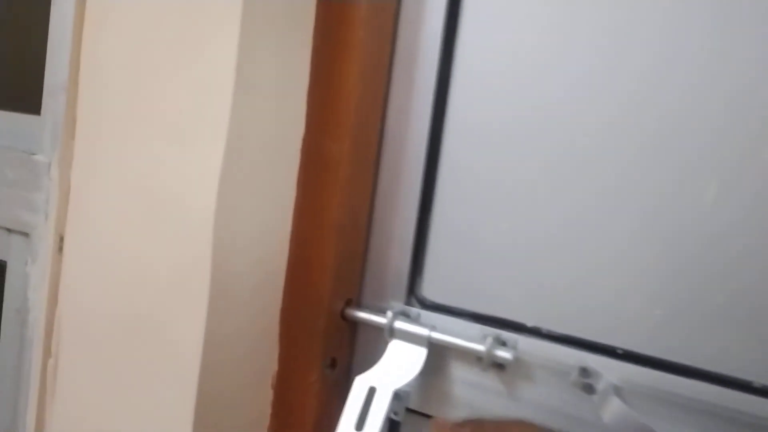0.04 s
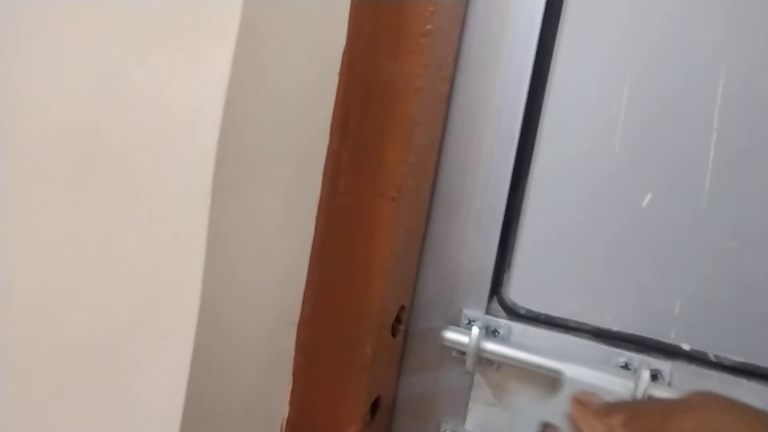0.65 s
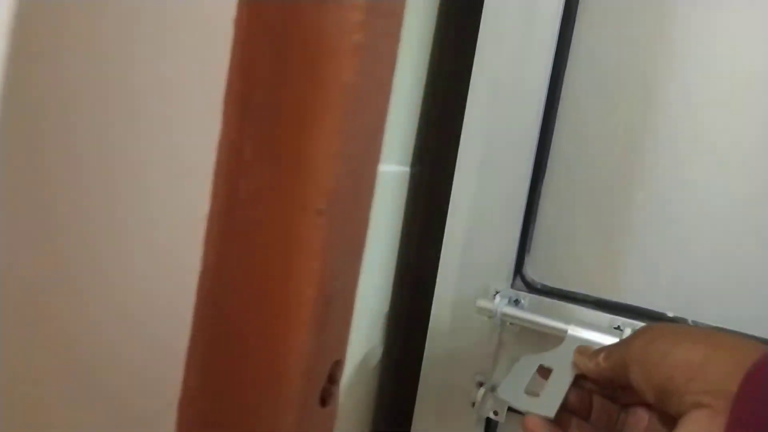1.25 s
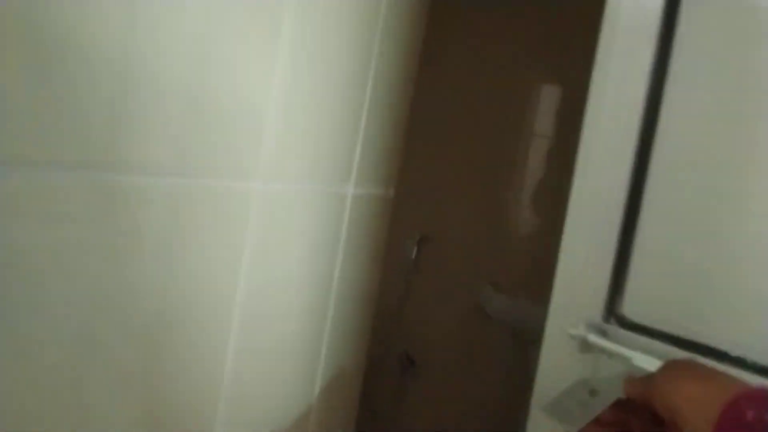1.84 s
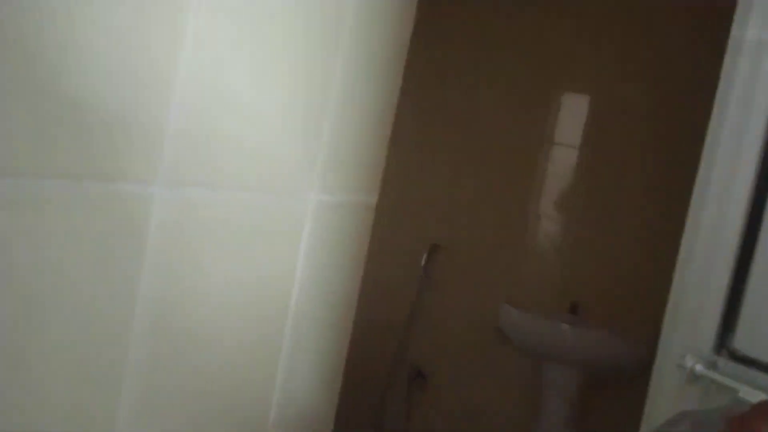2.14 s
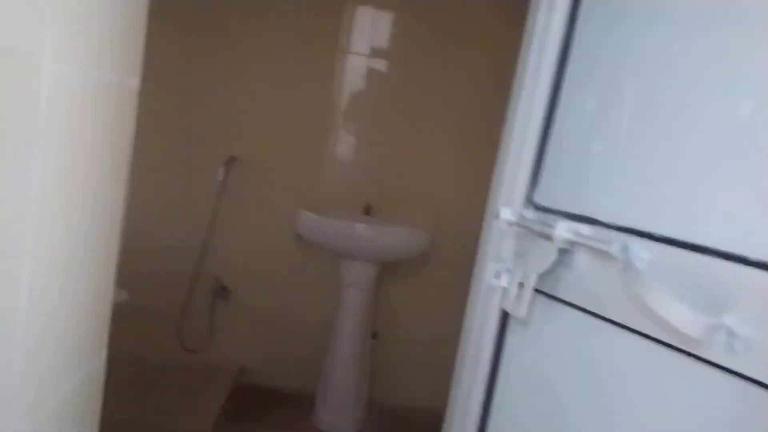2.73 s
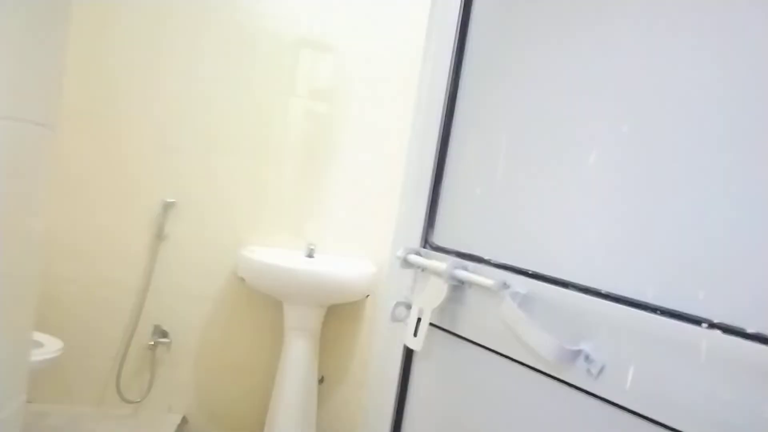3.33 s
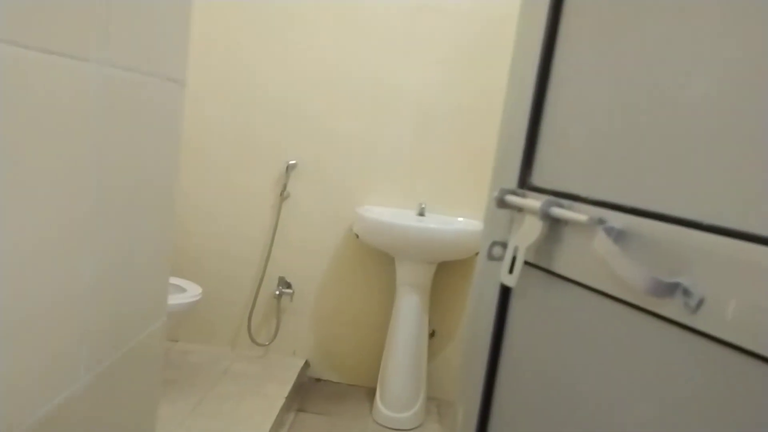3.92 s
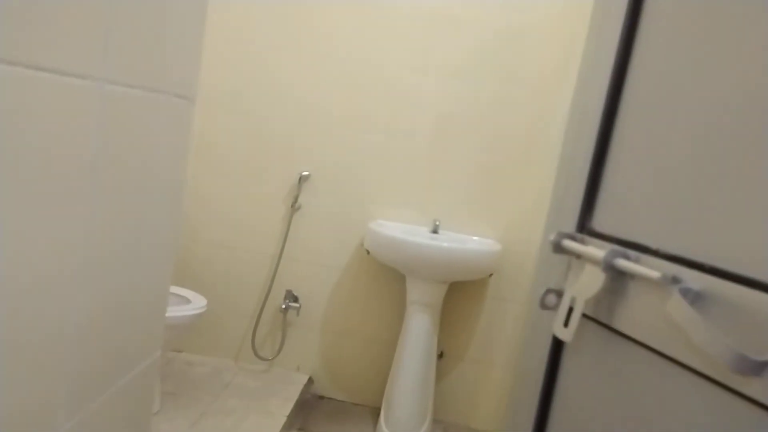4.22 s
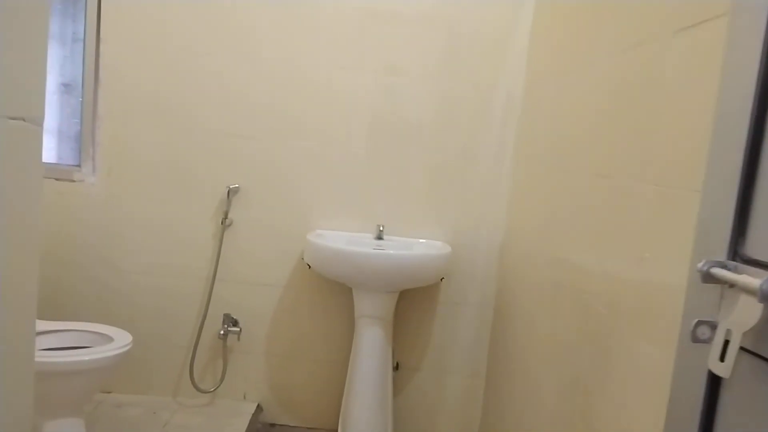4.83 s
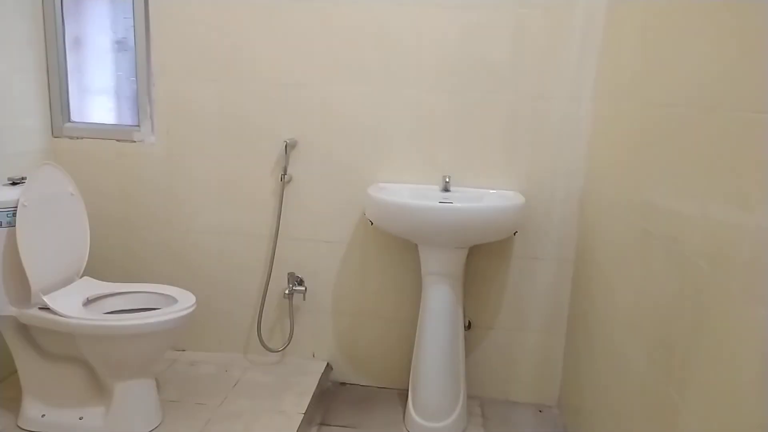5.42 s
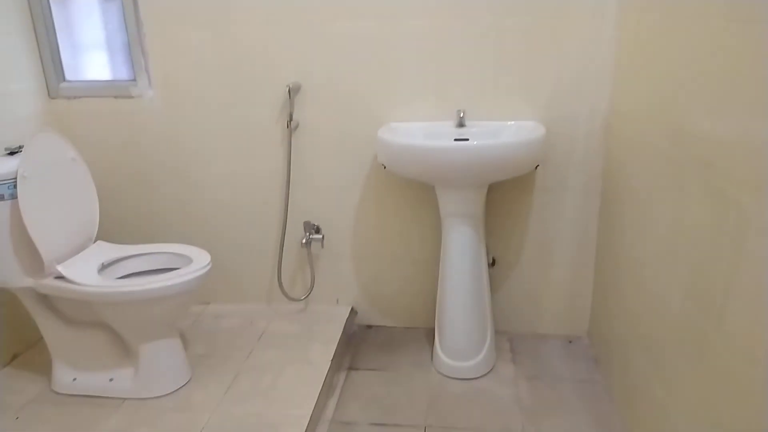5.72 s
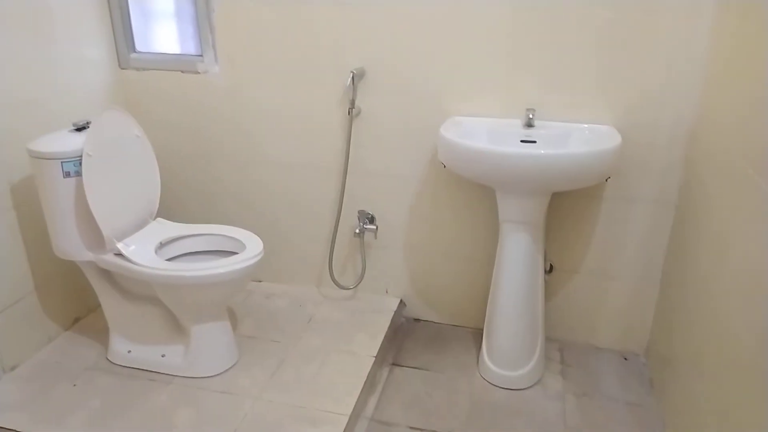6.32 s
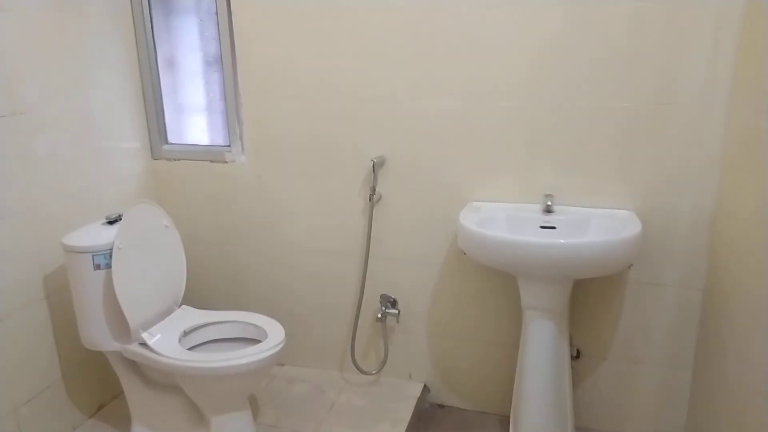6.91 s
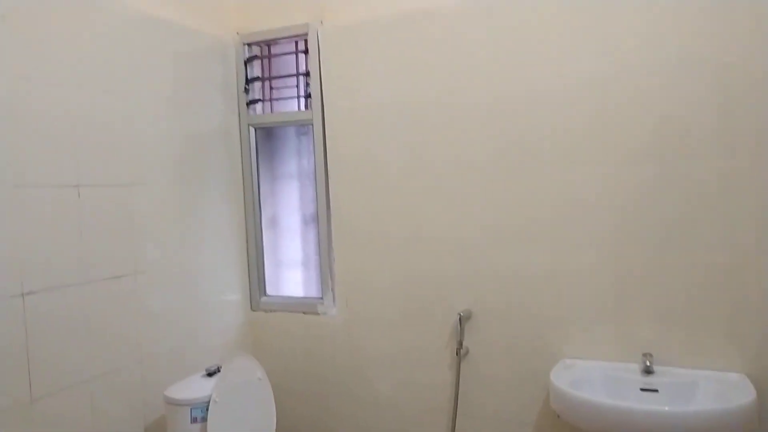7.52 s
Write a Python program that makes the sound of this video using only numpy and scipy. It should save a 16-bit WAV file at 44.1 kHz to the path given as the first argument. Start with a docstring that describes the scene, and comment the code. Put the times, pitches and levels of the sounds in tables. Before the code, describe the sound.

Sharp clacks of a bolt and hasp, a switch click and a hollow door bang echo off tiles, followed by knocks on the microphone.

```python
"""A barrel bolt on a thin aluminium door is twisted free, drawn back and clacks home; the latch rattles
and the hasp drops, ringing. The hinge sings faintly as the door swings into a bare tiled bathroom.
A light switch clicks and pings, the door panel thuds, and the leaf bumps its stop and booms.
Fingers knock on the hand-held phone, a sole scuffs over grit, and a few softer taps follow.
The hard walls echo the hardware and the scuff; sleeve rustle and microphone hiss run underneath."""
import sys
import numpy as np
from scipy import signal
from scipy.fft import rfft, irfft
from scipy.io import wavfile
from scipy.ndimage import uniform_filter1d

SR = 44100
rng = np.random.default_rng(int(sys.argv[2]) if len(sys.argv) > 2 else 0)


def wav_record(signal):
    """Record a signal, one row per channel, as 16-bit PCM in the file named by sys.argv[1]."""
    frames = np.transpose(np.atleast_2d(signal))
    bounded = np.clip(frames, -1, 1)
    # unit amplitude maps onto the largest positive 16-bit level
    quanta = np.round(bounded * 32767).astype(np.int16)
    wavfile.write(sys.argv[1], SR, quanta)


N = 333396
TIME = np.arange(N) / SR
FREQS = np.arange(N // 2 + 1) * SR / N

# Body tone of each struck part: (frequency [Hz], width [Hz], relative level [dB])
FRAME_BODY = [(80, 180, 4), (486, 110, 6), (670, 250, -2), (1060, 230, -5), (2500, 3200, -30)]
BOLT_BODY = [(123, 220, -0.5), (375, 200, -3.5), (617, 180, 3), (1090, 146, -1.5), (1690, 160, -7.5),
             (2290, 150, -10.5), (2830, 216, -10.5), (3280, 660, -9.5), (8900, 3000, -34)]
LATCH_BODY = [(302, 1400, 0.5), (1200, 200, 4), (1640, 630, 3.5), (3140, 2400, -6.5), (9000, 1800, -6)]
HASP_BODY = [(205, 146, -5.5), (483, 160, -7.5), (870, 340, -3), (1800, 390, -.5), (3110, 680, -1),
             (3920, 690, -9.5), (5100, 1100, -10), (6000, 730, -7.5), (7730, 800, -1), (8880, 350, 6.5),
             (9920, 170, 8.5), (10960, 720, -2.5)]
SPRING_BODY = [(2300, 940, -8.5), (4540, 530, -4), (8300, 1300, 1), (11000, 2000, -8)]
SWITCH_BODY = [(500, 164, -5.5), (877, 180, 3), (1078, 126, 7), (2040, 590, -3), (2800, 350, -2),
               (3520, 340, -5), (4480, 410, -1.5), (6460, 1400, -4.5), (8440, 1500, 0), (10600, 1600, -7)]
PANEL_BODY = [(67, 70, -14), (130.4, 36, 0.5), (209, 37, 5), (319, 65, -8), (530, 110, -19),
              (1140, 810, -34)]
DOOR_BODY = [(48, 50, -3.5), (135, 160, -17), (220, 76, 2.5), (281, 28, 3), (485, 400, -9.5),
             (760, 580, -15.5), (1136, 180, -6), (1540, 220, -15), (2550, 2200, -20), (3790, 300, -15),
             (8400, 670, -13.5), (10250, 1200, -19.5)]
PHONE_BODY = [(2070, 750, 0.5), (4868, 2850, -13.5), (9600, 2350, -3.5)]
# Hits on each part: (time [s], level [dB], rattle decay [s], reverb send [dB], left minus right [dB])
FRAME_HITS = [(.201, -38, 0.0066, -0.5, 0.5), (.273, -52, .017, -9, 2), (0.5552, -40, 0.01, -1.5, 0)]
BOLT_HITS = [(0.6297, -25, 0.0082, -1.6, .6)]
LATCH_HITS = [(1.635, -33.5, 0.0098, -1.5, -3), (2.062, -51, 0.0051, 1.5, -6)]
HASP_HITS = [(2.389, -16.5, 0.013, -3, 0.2)]
SPRING_HITS = [(3.015, -43.5, 0.0056, 0.5, -2), (3.1425, -20, 0.001, -9, 3)]
SWITCH_HITS = [(3.1444, -19, 0.0062, 1.9, -4)]
PANEL_HITS = [(1.64, -49, 0.022, -2.5, 0), (3.243, -44.5, 0.016, -3.5, 0), (3.904, -30, 0.015, -3.5, 0.13),
              (3.921, -28.5, 0.012, -9, 0), (3.939, -29.5, 0.014, -4.5, 0),
              (4.985, -20.5, 0.02, -13.5, -1.3)]
DOOR_HITS = [(4.98, -20.5, 0.035, 0.5, 0.28), (5.017, -25.5, 0.026, -5, -2),
             (5.038, -25.5, 0.056, -4.5, -1), (5.087, -36, 0.024, -4, 0), (5.172, -37, 0.011, -16, 0),
             (5.222, -41, .014, -12, 0)]
# Partials that ring on after a hit: (frequency [Hz], level [dB], t60 [s])
BOLT_PARTIALS = [(342, -44, 1.25), (477, -50.5, 3.3), (606, -48, 2.9), (708, -48.5, 1.6)]
HASP_PARTIALS = [(249.4, -37.5, 0.66), (1610, -42, 0.85), (1700, -39, 0.73), (1776, -48, 1.3),
                 (2896, -40, 0.6), (2988, -55, 1.4), (3350, -42, .6), (3844, -46, 0.56), (7700, -47, .8),
                 (8900, -45, 0.7), (9851, -43, 0.54), (14400, -40, 0.36)]
SWITCH_PARTIALS = [(1100, -44, 1.8), (1938, -53, 2.5), (2820, -48, .5), (4190, -40, 0.18), (4425, -47, .9),
                   (4660, -25, .04)]
PANEL_PARTIALS = [(138, -44, 1), (213, -42, 1.4)]
DOOR_PARTIALS = [(144.6, -44, 1.1), (225, -31, 0.97), (274.4, -33, 1.85), (469, -32.5, 0.96),
                 (1113, -33, 0.65), (1245, -49, .8), (1490, -35, 0.59)]
# Light ticks of loose metal and handling: (time [s], level [dB], pitch [Hz])
LOOSE_TICKS = [(.053, -52, 980), (.063, -47, 11000), (.107, -51, 9000), (.258, -48, 1080),
               (0.555, -47.5, 6200), (0.6271, -31.5, 1410), (.635, -38.5, 3550), (2.062, -44.5, 8700),
               (3.108, -46.5, 910), (4.225, -42.5, 8700), (4.286, -41, 8600), (5.095, -34.5, 2450),
               (6.9615, -44, 8450), (7.098, -55, 4700)]
# Fingers knocking on the phone:
# (time [s], level [dB], start pitch [Hz], end pitch [Hz], t60 [s], click mix [dB], left minus right [dB])
FINGER_KNOCKS = [(5.3279, -13, 606, 282, 0.023, 1.5, 27.5), (5.335, -23, 170, 110, 0.047, -30, 17),
                 (5.5523, -7, 996, 167, 0.0703, -2, -22), (5.554, -15.5, 1080, 880, 0.023, -30, -21),
                 (5.555, -10, 257, 123, 0.046, -15, -17), (5.646, -27, 603, 308, 0.029, -19, -8),
                 (6.334, -31, 700, 383, 0.011, -19, -16), (6.46, -37.5, 650, 380, .012, -16, -5),
                 (6.604, -32.5, 600, 316, 0.025, -22, -6), (6.705, -40, 600, 320, 0.021, -17.5, 1),
                 (7.395, -21.5, 2230, 235, 0.019, -33, -44)]
# One catch of a slipping finger:
# (start pitch [Hz], end pitch [Hz], t60 [s], click mix [dB], left minus right [dB])
FINGER_CATCH = (520, 440, 0.008, -34, -4)
# Colour of each rubbed surface: (frequency [Hz], width [Hz], relative level [dB])
SHAFT_COLOUR = [(5900, 3600, -5), (8500, 1500, 3.5), (10000, 2600, 1)]
BARREL_COLOUR = [(1050, 560, 1), (2380, 600, -5), (3470, 580, 1)]
SOLE_COLOUR = [(253, 190, -7.5), (549, 69, 1), (695, 300, -8.5), (1090, 310, -2.5), (1810, 330, -4),
               (2460, 43, 1), (2530, 710, -1.5), (4500, 1800, -4), (6940, 730, -9), (8650, 2700, 2),
               (10130, 1100, -1)]
SKIN_COLOUR = [(465, 240, -0.92), (1030, 660, -0.084)]
CLOTH_COLOUR = [(388, 760, 4), (2340, 1830, 0.5), (7730, 4300, 0.5), (9540, 1420, 6)]
# Rubbing strokes of bolt, finger and arm: (peak time [s], level [dB], length [s])
SHAFT_STROKES = [(.066, -58, .03), (.116, -41.5, 0.051), (.262, -41.5, 0.092)]
BARREL_STROKES = [(.525, -50.5, 0.069)]
FINGER_STROKES = [(7.365, -52, 0.075)]
ARM_STROKES = [(.03, -55, 0.37), (0.25, -49, 0.24), (0.54, -48, 0.13), (1.324, -59, 0.59),
               (1.935, -54.5, 0.3), (3.842, -55, 0.09), (4.044, -51.5, 0.14), (4.28, -50.5, 0.12),
               (4.786, -49.5, 0.19), (5.484, -46, 0.34), (6.709, -49, 0.047), (6.89, -48.5, 0.24),
               (7.42, -52.5, 0.057)]
# Reverb time of the tiled room: (frequency [Hz], t60 [s])
ROOM_DECAY = [(60, 1.33), (200, 1.83), (600, 1.83), (1100, 1.7), (2500, 1.49), (5000, 1.25), (8500, 1.01),
              (12000, 0.93), (16000, 0.65)]
# Spectrum of room rumble and microphone hiss: (frequency [Hz], relative level [dB])
FLOOR_SPECTRUM = [(20, 16), (45, 6), (100, 1.5), (210, 3), (400, -6.5), (1000, -5.5), (2000, -17),
                  (4000, -13.5), (6300, -18.5), (7500, 0), (8600, 11), (9400, 4.5), (10500, -10.5),
                  (12500, -82), (15500, -60)]
# Fader ride on that noise floor, lower at first: (time [s], gain [dB])
FLOOR_RIDE = [(0, -5), (1.15, -8.5), (2.15, -0.5), (7.56, 1.5)]


def undb(db):
    """Decibels to gain."""
    return 10 ** (np.asarray(db) / 20)


def unit(x):
    """Scale to an rms of one."""
    return x / np.sqrt(np.mean(x ** 2))


def over_pitch(rows, hz):
    """Read (frequency, value) rows on a log-frequency axis."""
    points, values = np.transpose(rows)
    return np.interp(np.log(hz + 1), np.log(points), values)


def pan(db):
    """Constant-power gains, the left louder by db."""
    return unit(undb(np.array([[db], [-db]]) / 2))


def add(out, s, x):
    """Mix a sound in at s seconds."""
    i = max(int(s * SR), 0)
    out[:, i:i + x.shape[-1]] += x[..., :N - i]


def envelope(start_s, attack_s, slope_db_per_s, stop_s=np.inf, release_s=1):
    """A smooth attack, a steady slope in dB, and a release after the stop."""
    t = np.maximum(TIME - start_s, 0)
    attack = 1 - np.exp(-(t / attack_s) ** 2)
    release = np.exp(-np.maximum(TIME - stop_s, 0) / release_s)
    return attack * undb(slope_db_per_s * np.minimum(t, stop_s - start_s)) * release


def strokes(moves, rise, rest_db=-120):
    """Bell-shaped swells of rubbing; rise is the share of each spent speeding up."""
    power = undb(rest_db) ** 2
    for s, db, length_s in moves:
        width = length_s * np.where(TIME < s, rise, 1 - rise)
        power = power + undb(db) ** 2 * np.exp(-((TIME - s) / width) ** 2)
    return np.sqrt(power)


def body(resonances, size=8192):
    """Minimum-phase impulse response of an object with steep-sided resonances."""
    hz = np.arange(size // 2 + 1) * SR / size
    power = sum(undb(db) ** 2 / (1 + ((hz - f) / w * 1.24) ** 2) ** 2 for f, w, db in resonances)
    cepstrum = irfft(np.log(power + 1e-12) / 2)
    cepstrum[1:size // 2] *= 2
    cepstrum[size // 2 + 1:] = 0
    return irfft(np.exp(rfft(cepstrum)))[None, :size // 2]


def whiten(x, bins):
    """Flatten the broad colour of a burst, leaving its fine grain."""
    spectrum = rfft(x, 2 * x.shape[-1])
    colour = np.sqrt(uniform_filter1d(abs(spectrum) ** 2, bins, mode="reflect") + 1e-12)
    return irfft(spectrum / colour)[..., :x.shape[-1]]


def narrow_tone(hz, width_hz):
    """A noise band so narrow that it reads as a wandering tone."""
    band = np.exp(-((FREQS - hz) / width_hz) ** 2)
    return unit(irfft(rfft(rng.standard_normal(N)) * band, N))


def strike(resonances, hits, attack, spread, snap_db=-60, snap_hz=9000, right_late_s=0, rebound=0):
    """A hard first contact and a dense rattle of loose parts, rung through the body and the room."""
    out, ring, t = np.zeros((2, N)), body(resonances), TIME[:4096]
    ring = ring - rebound * np.roll(ring, round(SR / 1102), axis=1)  # returns inverted from the far edge
    snap = body([(snap_hz, snap_hz, 0)])
    echo = signal.fftconvolve(ring / np.linalg.norm(ring), tiled_room(), axes=1)
    for s, db, rattle_s, room_db, pan_db in hits:
        noise = rng.standard_normal((3, len(t)))
        force = (noise[0] + spread * noise[1:]) * np.exp(-t / rattle_s - (t / rattle_s) ** 4 / 2)
        force /= np.linalg.norm(force, axis=1, keepdims=True)
        force[:, 0] += attack
        direct = signal.fftconvolve(whiten(force, bins=120), ring, axes=1)
        direct /= np.linalg.norm(direct, axis=1, keepdims=True)
        add(direct, 0, undb(snap_db) * snap / np.linalg.norm(snap))  # thin snap of the contact itself
        direct[1] = np.roll(direct[1], int(right_late_s * SR))
        gain = undb(db) * np.sqrt(.015 * SR)  # level counts as energy spread over 15 ms
        add(out, s, gain * pan(pan_db) * direct)
        add(out, s, gain * undb(room_db) * pan(pan_db / 2) * echo)
    return out


def ring_out(partials, start_s, flutter, flutter_hz=22):
    """Metal sings on after a hit; reflections flutter each partial differently at the two ears."""
    out, t = np.zeros((2, N)), TIME[:2 * SR]
    rise = 1 - np.exp(-t / .004)
    for hz, db, t60 in partials:
        paths = rng.standard_normal((2, 256)) + 1j * rng.standard_normal((2, 256))
        drift = np.array([np.interp(t * flutter_hz, np.arange(len(p)), p) for p in paths])
        steady = np.exp(1j * rng.uniform(0, 1.35, (2, 1)))
        shimmer = (steady + flutter * drift) / np.hypot(1, flutter)
        tone = np.imag(shimmer * np.exp(2j * np.pi * hz * t))
        add(out, start_s, rise * undb(db - 60 * t / t60) * tone)
    return out


def rub(resonances, pressure, grain_db, catch_db, catch_hz, room_db):
    """Friction: a stream of tiny uneven slips that catches and runs on, coloured by the surfaces."""
    grain = np.repeat(rng.standard_normal(N // 64 + 1), 64)[:N]
    catches = 1.2 * np.interp(TIME * catch_hz, np.arange(8192), rng.standard_normal(8192))
    slips = rng.standard_normal((2, N)) * undb(grain_db * grain + catch_db * catches)
    direct = unit(signal.oaconvolve(slips, body(resonances), axes=1)[:, :N]) * pressure
    return with_room(direct, room_db)


def barrel_bolt():
    """The frame knocks as the bolt twists and drags; it hits its stop and the leaf rings hollow."""
    out = strike(FRAME_BODY, FRAME_HITS, attack=.21, spread=1, right_late_s=.00051)
    out += strike(BOLT_BODY, BOLT_HITS, attack=.23, spread=.28, snap_db=-23, snap_hz=3480)
    out += ring_out(BOLT_PARTIALS, BOLT_HITS[0][0], flutter=.87, flutter_hz=21)
    twist, drag = strokes(SHAFT_STROKES, rise=.39), strokes(BARREL_STROKES, rise=.38)
    out += rub(SHAFT_COLOUR, twist, grain_db=1.5, catch_db=1, catch_hz=91, room_db=-7)
    return out + rub(BARREL_COLOUR, drag, grain_db=3.5, catch_db=1.5, catch_hz=220, room_db=1)


def latch_and_hasp():
    """The latch rattles, then the hasp drops with a bright clack and a thin ring."""
    out = strike(LATCH_BODY, LATCH_HITS, attack=.23, spread=1, right_late_s=.0005)
    out += strike(HASP_BODY, HASP_HITS, attack=.045, spread=2.3, snap_db=-3, snap_hz=9800,
                  right_late_s=.0007, rebound=.55)
    return out + ring_out(HASP_PARTIALS, HASP_HITS[0][0], flutter=.42, flutter_hz=18)


def light_switch():
    """The spring ticks, and the switch snaps over and pings."""
    out = strike(SPRING_BODY, SPRING_HITS, attack=.57, spread=.72, right_late_s=.00071)
    out += strike(SWITCH_BODY, SWITCH_HITS, attack=.083, spread=.98, right_late_s=.00066)
    return out + ring_out(SWITCH_PARTIALS, SWITCH_HITS[0][0], flutter=.56)


def door_panel():
    """The thin panel thuds and booms as it flexes."""
    thuds = strike(PANEL_BODY, PANEL_HITS, attack=.77, spread=.22, right_late_s=.00041)
    return thuds + ring_out(PANEL_PARTIALS, start_s=3.915, flutter=.76)


def door_stop():
    """The leaf bumps its stop, chatters and rings on."""
    bumps = strike(DOOR_BODY, DOOR_HITS, attack=.11, spread=.96)
    return bumps + ring_out(DOOR_PARTIALS, DOOR_HITS[0][0], flutter=1.16, flutter_hz=29.6)


def sole_scuff():
    """A sole lands quickly and slides over grit with fading pressure."""
    pressure = undb(-21.5) * envelope(5.768, .0088, slope_db_per_s=-97, stop_s=5.855, release_s=.019)
    return pan(.95) * rub(SOLE_COLOUR, pressure, grain_db=3, catch_db=1.4, catch_hz=130, room_db=-4.5)


def finger_slip(start_s=5.5106, gap_s=.0092, jitter_s=.0008):
    """Knock rows for a finger that sticks and slips on the phone, firming up and then easing off."""
    return [(start_s + k * gap_s + jitter_s * rng.standard_normal(),
             -7.5 - 3 * abs(k - 1.4), *FINGER_CATCH) for k in range(5)]


def finger_knocks(relax_share=.0374, click_s=.0006):
    """A fingertip hits the phone: the shell clicks and a dry thud dives as the contact relaxes."""
    out, t = np.zeros((2, N)), TIME[:4096]
    shell = body(PHONE_BODY)[0]
    for s, db, start_hz, end_hz, t60, click_db, pan_db in FINGER_KNOCKS + finger_slip():
        hz = end_hz + (start_hz - end_hz) * np.exp(-t / (relax_share * t60))
        rise = 1 - np.exp(-(t * start_hz * 1.5) ** 2)
        thud = np.sin(2 * np.pi * np.cumsum(hz) / SR) * undb(-60 * t / t60) * rise
        contact = whiten(rng.standard_normal(len(t)) * np.exp(-t / click_s), bins=400)
        click = signal.fftconvolve(contact, shell)[:len(t)]
        add(out, s, undb(db) * pan(pan_db) * (thud + undb(click_db) * click / abs(click).max()))
    return out


def loose_ticks(contact_s=.0045):
    """Brief contacts, each one ringing pitch over a broad click."""
    out, t = np.zeros((2, N)), TIME[:1024]
    for s, db, hz in LOOSE_TICKS:
        contact = rng.standard_normal((2, len(t))) * np.exp(-t / contact_s)
        tick = signal.fftconvolve(contact, body([(hz, hz * .28, 0), (hz, hz * 1.14, -8)]), axes=1)
        add(out, s, undb(db) * np.sqrt(.03 * SR) * tick / np.linalg.norm(tick))
    return with_room(out, room_db=-5)


def handling_rustle():
    """The sleeve swishes with the arm, never quite still; a finger shifts on the phone."""
    arm, finger = strokes(ARM_STROKES, rise=.51, rest_db=-65), strokes(FINGER_STROKES, rise=.61)
    sleeve = rub(CLOTH_COLOUR, arm, grain_db=2, catch_db=1.8, catch_hz=35, room_db=-5)
    return sleeve + rub(SKIN_COLOUR, finger, grain_db=.5, catch_db=4.5, catch_hz=80, room_db=-28)


def dry_hinge(hz=1155, waver=.68):
    """The hinge sings one faint, wavering note that swells as the door swings."""
    wander = np.array([narrow_tone(hz, width_hz=16) for _ in range(2)])
    note = unit(np.sin(2 * np.pi * hz * TIME)) + waver * wander
    return note * undb(-62.5) * envelope(2.51, .13, slope_db_per_s=5, stop_s=3.14, release_s=.025)


def leaf_sway(below_hit_db=18):
    """Each hit on the leaf sets it swaying and pumping the air: a sub-bass swell."""
    energy = sum((undb(db - below_hit_db) * envelope(s, attack_s=.19, slope_db_per_s=-21.5)) ** 2
                 for s, db, *_ in BOLT_HITS + LATCH_HITS + PANEL_HITS + DOOR_HITS)
    return narrow_tone(hz=22, width_hz=4) * np.sqrt(energy)


def tiled_room(build_s=.0083, mono_below_hz=520, size=65536):
    """Diffuse echo off hard walls: treble dies first, and the bass is nearly mono."""
    t, hz = TIME[:size], np.arange(size // 2 + 1) * SR / size
    mid, side = rfft(rng.standard_normal((2, size)))
    alike = .92 / (1 + (hz / mono_below_hz) ** 4)
    ears = mid * np.sqrt((1 + alike) / 2) + np.array([[1], [-1]]) * side * np.sqrt((1 - alike) / 2)
    edges = np.r_[0, np.geomspace(100, 13000, 13), SR]
    tail = 0
    for low, high in zip(edges, edges[1:]):
        band = irfft(ears * ((hz >= low) & (hz < high)))
        power = np.mean(band ** 2, axis=0)
        leveller = np.sqrt(power.mean() / uniform_filter1d(power, size=2500))  # keeps the decay smooth
        t60 = over_pitch(ROOM_DECAY, low * 1.2)
        tail = tail + band * leveller * np.exp(-np.log(1000) * t / t60)
    return unit(tail * (1 - np.exp(-(t / build_s) ** 2))) / np.sqrt(size)


def with_room(direct, room_db):
    """A sound together with its echo."""
    return direct + undb(room_db) * signal.fftconvolve(direct, tiled_room(), axes=1)[:, :N]


def noise_floor(mono_below_hz=350, ripple_db=7):
    """Faint, centred room rumble under microphone hiss with a finely ribbed peak up top."""
    noise = rfft(rng.standard_normal((3, N)))
    alike = .9 / (1 + (FREQS / mono_below_hz) ** 2)
    ears = noise[0] * np.sqrt(alike) + noise[1:] * np.sqrt(1 - alike)
    ribs = np.cos(2 * np.pi * (FREQS - 8690) / 238) * np.exp(-((FREQS - 8690) / 1500) ** 2)
    colour = undb(over_pitch(FLOOR_SPECTRUM, FREQS) + ripple_db * ribs)
    ride_db = np.interp(TIME, *np.transpose(FLOOR_RIDE))
    return undb(-48 + ride_db) * unit(irfft(ears * colour, N))


def scene():
    """Hardware up front, body foley around it, a quiet bed underneath."""
    hardware = barrel_bolt() + latch_and_hasp() + light_switch() + door_panel() + door_stop()
    foley = sole_scuff() + finger_knocks() + loose_ticks() + handling_rustle()
    return hardware + foley + dry_hinge() + leaf_sway() + noise_floor()


def record(dry, shelf_hz=12000, shelf_db=-7, top_hz=15400):
    """The right microphone is duller up top; the phone clips at full scale and cuts the highest air."""
    shelf = undb(shelf_db / (1 + (shelf_hz / (FREQS + 1)) ** 12))
    ears = np.array([dry[0], irfft(rfft(dry[1]) * shelf, N)])
    high_cut = signal.ellip(8, .2, 70, top_hz, fs=SR, output="sos")
    return signal.sosfilt(high_cut, np.clip(ears, -1, 1))


dry = scene()
out = record(dry)
wav_record(out)
```